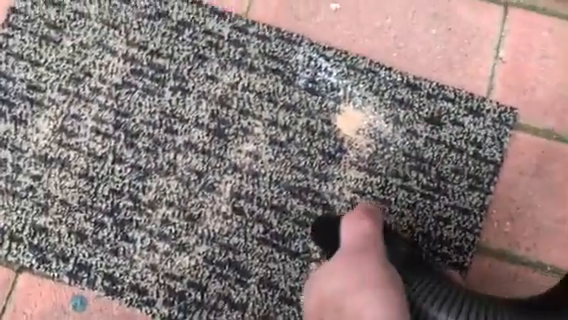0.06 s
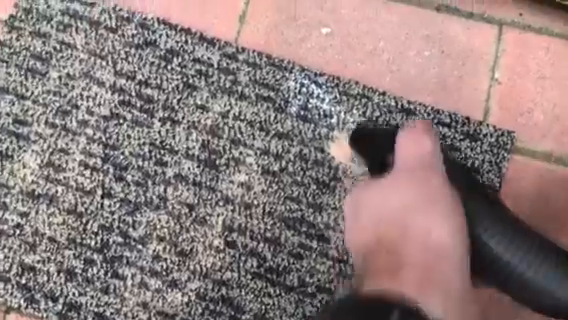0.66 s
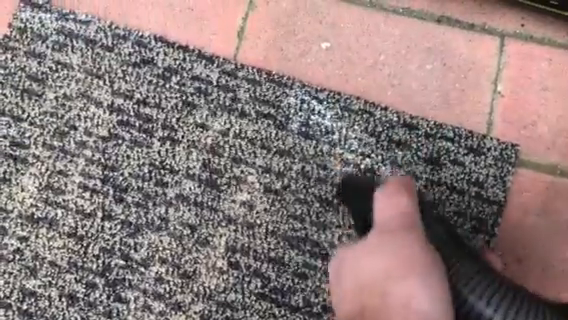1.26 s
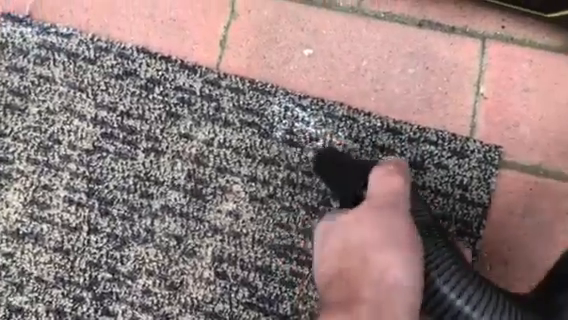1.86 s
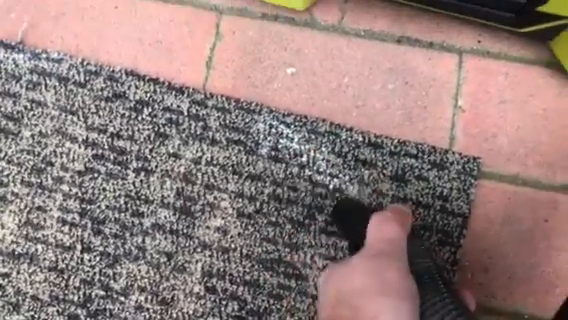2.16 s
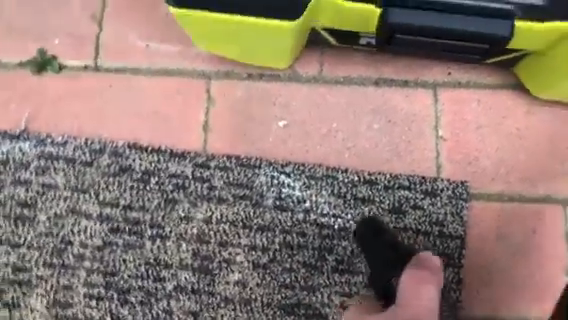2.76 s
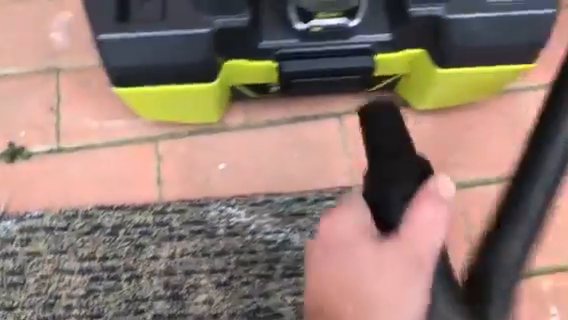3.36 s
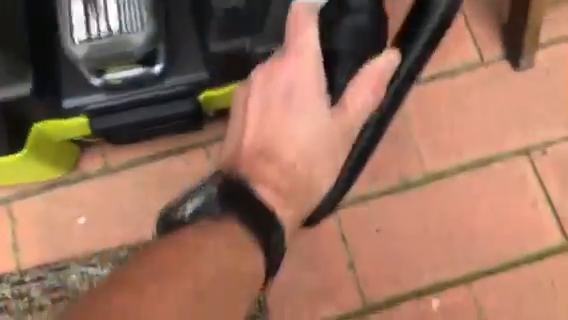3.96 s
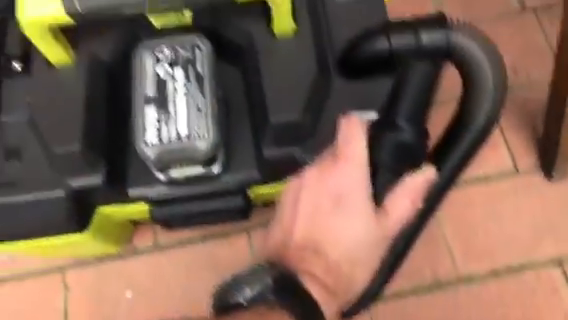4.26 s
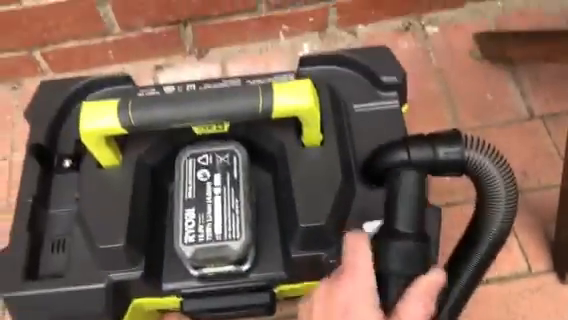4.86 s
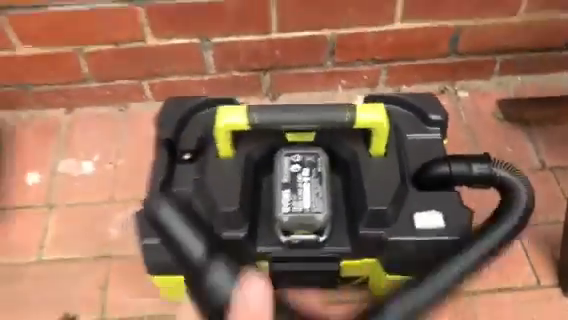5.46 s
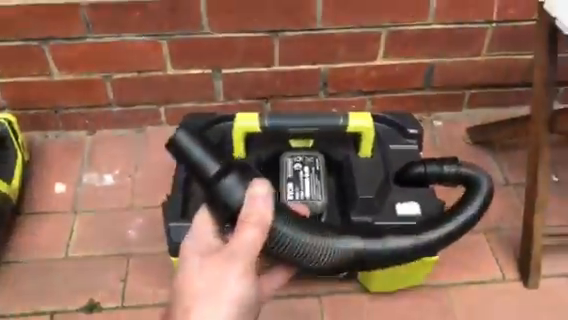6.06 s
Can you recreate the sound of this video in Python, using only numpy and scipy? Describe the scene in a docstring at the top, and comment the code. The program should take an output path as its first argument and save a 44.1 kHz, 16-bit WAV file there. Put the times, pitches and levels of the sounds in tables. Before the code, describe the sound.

A vacuum cleaner whines and rushes with air, its nozzle hissing against a mat, then it is switched off and winds down.

```python
"""Wet-dry vacuum on a doormat.

A cordless vacuum runs outdoors on brick paving: the rotor hums, the fan whines, the bearings
sing and air rushes through hose and tub. Pressed on the mat, the nozzle hisses and the unloaded
fan speeds up. The microphone moves from mat to machine; then the motor is switched off and
coasts, its tones gliding down through the resonances of housing, fan chamber and tub."""
import sys
import numpy as np
from scipy import signal
from scipy.fft import rfft, irfft
from scipy.io import wavfile
from scipy.ndimage import uniform_filter1d

SR = 44100
rng = np.random.default_rng(int(sys.argv[2]) if len(sys.argv) > 2 else 0)


def materialize(psi):
    """Save the field psi as 16-bit PCM at rate SR to the path in sys.argv[1].

    A 1-D psi becomes a single channel; in a 2-D psi each row is a channel.
    """
    bounded = np.clip(np.atleast_2d(psi).T, -1, 1)
    quanta = np.round(bounded * 32767).astype(np.int16)
    wavfile.write(sys.argv[1], SR, quanta)


N = 274302
TIME = np.arange(N) / SR
FREE_HZ, OFF_S = 356.67, 4.801  # shaft speed with the nozzle open; switch-off
BAND_LIMIT_HZ = 15700


def motor(jitter_turns=0.0015):
    """All tones lock to one slightly unsteady shaft."""
    speed = shaft_hz(TIME)
    turns = np.cumsum(speed) / SR + jitter_turns * wander(17)
    return hum(turns, speed) + whines(turns, speed) + overtones(turns, speed) + brushes(turns, speed)


def shaft_hz(t, sag_hz_per_s=0.24, sealed_rise_hz=4.55, inertia_s=0.19, drag_s=1.1916, friction_hz=102.7):
    """The battery sags; a sealed nozzle unloads the fan; after switch-off, drag and friction brake it."""
    grid_s = np.arange(-SR // 2, N, 50) / SR
    pole = np.exp(-(grid_s[1] - grid_s[0]) / inertia_s)
    unloaded = np.interp(t, grid_s, signal.lfilter([1 - pole], [1, -pole], seal(grid_s)))
    powered_hz = FREE_HZ - sag_hz_per_s * np.minimum(t, OFF_S) + sealed_rise_hz * unloaded
    return (powered_hz + friction_hz) / (1 + np.maximum(t - OFF_S, 0) / drag_s) - friction_hz


def speed_db(t):
    """Shaft speed relative to free running."""
    return 20 * np.log10(shaft_hz(t) / FREE_HZ)


# Hum at the moving microphone: time_s, level_db
HUM_LEVELS = [(0.0, -13.5), (0.07, -13), (1.94, -13), (2.66, -14), (2.86, -13), (3.26, -15.5), (3.74, -14),
              (4.06, -16.5), (4.8, -19)]
# Tub resonances and cancellations: centre_hz, width_hz, lift_db
TUB_HUM_MODES = [(151, 14, 7), (165, 4.3, -21), (191, 30, 10), (260, 17, 3), (296, 9, -10), (317, 32, 2.5)]


def hum(turns, speed, speed_power=3.44, flutter=0.077, flutter_hz=38, sway_db=0.35):
    """The unbalanced rotor hums once a turn; hose buffeting shakes its level and phase."""
    shake = flutter * amp(buffeting_db(TIME))
    level_db = curves(HUM_LEVELS)[0] + speed_power * speed_db(TIME)
    level_db += lift(TUB_HUM_MODES, speed) + sway_db * wander(4)
    shaken_turns = turns + shake * wander(flutter_hz) / (2 * np.pi)
    return tone(shaken_turns, level_db) * (1 + shake * wander(flutter_hz))


# Low, mid and top fan whine: shaft_order
FAN_ORDERS = [9, 15, 18]
# Each whine under power, at the moving microphone: time_s, level_db
LOW_WHINE_LEVELS = [(0.0, -25), (0.64, -34.5), (0.72, -50), (1.198, -41), (1.6, -43), (2.0, -33.5),
                    (2.159, -54), (2.32, -34.5), (3.12, -31), (3.68, -37), (3.919, -29.6), (4.0, -36.5),
                    (4.8, -41.5)]
MID_WHINE_LEVELS = [(0.0, -26.5), (1.36, -32), (1.52, -36), (2.32, -34), (2.4, -59), (2.72, -38),
                    (3.04, -46), (3.36, -25.5), (3.92, -34), (4.08, -30), (4.48, -34.4), (4.56, -57),
                    (4.8, -31)]
TOP_WHINE_LEVELS = [(0.0, -34.5), (0.32, -24.5), (0.48, -23), (0.8, -34.5), (1.04, -31), (2.0, -31.5),
                    (2.4, -40), (2.48, -29.5), (2.8, -33), (3.12, -25.8), (3.68, -30), (3.84, -41),
                    (4.0, -32), (4.8, -31.8)]
# Coasting, one row per whine: base_db, speed_power
WHINE_DECAYS = [(-37, 2.5), (-36, 2.9), (-39, 3.9)]
# Fan-chamber resonances: shaft_order, centre_hz, width_hz, lift_db
CHAMBER_MODES = [(9, 3050, 260, 10.5), (9, 2120, 300, 14.5), (15, 4680, 590, 9.5), (15, 3480, 130, 7),
                 (18, 5100, 380, 6)]


def whines(turns, speed, roughness=0.15, echo_depth=0.79, handover_s=0.033, waver_db=0.75):
    """Three fan whines; coasting, they fade with speed and flare in the chamber's resonances."""
    coasting = np.clip((TIME - OFF_S) / handover_s, 0, 1)
    slowing_db = speed_db(TIME)
    levels = (LOW_WHINE_LEVELS, MID_WHINE_LEVELS, TOP_WHINE_LEVELS)
    out = np.zeros(N)
    for order, level, (base_db, speed_power) in zip(FAN_ORDERS, levels, WHINE_DECAYS):
        hz = order * speed
        powered_db = curves(level)[0] + waver_db * wander(7.4)
        modes = [mode for mode_order, *mode in CHAMBER_MODES if round(mode_order) == order]
        coast_db = base_db + speed_power * slowing_db + lift(modes, hz) + echo_depth * echoes_db(hz)
        whine = tone(order * turns, powered_db + (coast_db - powered_db) * coasting)
        out += whine * (1 + roughness * wander(35))
    return out


# Weaker tones, fractional ones from the ball bearings: shaft_order
OVERTONE_ORDERS = [2, 2.452, 2.598, 3, 4, 5.196, 7, 7.794, 10, 13, 14, 15.588, 21, 22, 27, 28, 35, 36, 42,
                   49]
# Their base levels, one row per order: over_mat_db, over_machine_db, coasting_db
OVERTONE_LEVELS = [(-38, -36, -57.5), (-40, -44.5, -70), (-38, -33, -46), (-41, -48, -57),
                   (-50, -47.5, -71), (-42, -48, -54), (-38.5, -42.5, -54), (-41, -61, -65.5),
                   (-47, -45, -57.5), (-45, -49, -57), (-44, -41.5, -69), (-64, -57, -58),
                   (-57, -47, -49.5), (-57, -56, -56), (-42, -49, -71), (-55, -62, -58.5), (-60, -59, -63),
                   (-48, -71, -72), (-52, -66, -65), (-68, -60, -62)]
# Fan-casing resonance, reached as the fan speeds up: centre_hz, width_hz, lift_db
CASING_MODES = [(9740, 70, 8.5)]


def overtones(turns, speed, speed_power=0.35, handover_s=0.12, waver_db=1.72):
    """Bearing tones and weak shaft harmonics; coasting, they flare in the housing's resonances."""
    coasting = np.clip((TIME - OFF_S) / handover_s, 0, 1)
    fall_db = speed_power * speed_db(TIME)
    out = np.zeros(N)
    for order, (mat_db, machine_db, coasting_db) in zip(OVERTONE_ORDERS, OVERTONE_LEVELS):
        hz = order * speed
        powered_db = mat_db + (machine_db - mat_db) * over_machine(TIME)
        powered_db += lift(CASING_MODES, hz) + waver_db * wander(0.99)
        unpowered_db = coasting_db + fall_db + housing_db(hz)
        out += tone(order * turns, powered_db + (unpowered_db - powered_db) * coasting)
    return out


def brushes(turns, speed, base_db=-80.0, segments=7, segment_lift_db=8.5, spread_db=3):
    """Brushes tick over the commutator segments: a thin buzz from switch-off onward."""
    start = round(OFF_S * SR)
    out = np.zeros(N)
    for order in sorted(set(range(11, 113)) - set(OVERTONE_ORDERS + FAN_ORDERS)):
        hz = order * speed[start:]
        order_db = base_db + segment_lift_db * (order % segments == 0) + spread_db * rng.standard_normal()
        level_db = order_db - 22 * np.log10(order / 50) + housing_db(hz)
        out[start:] += tone(order * turns[start:], level_db) * (hz < BAND_LIMIT_HZ)
    return out


# Motor-housing resonances: centre_hz, width_hz, lift_db
HOUSING_MODES = [(240, 39, 16), (401, 47, 9.5), (564, 150, -12), (740, 144, 8), (893, 164, 16.5),
                 (1030, 55, 20), (1850, 230, 10.5), (2294, 210, 5), (3100, 220, -1), (3840, 570, 10.5),
                 (4700, 280, 6), (5440, 360, 6), (6360, 420, 5.5), (7540, 500, 5.5), (10900, 750, 7)]


def housing_db(hz):
    """The housing's resonances and steep treble fall, plus echo ripple."""
    grid_hz = np.geomspace(100, SR / 2, 1500)
    treble_db = np.interp(grid_hz, [11500, 13000], [0, -14])
    return np.interp(hz, grid_hz, lift(HOUSING_MODES, grid_hz) + treble_db) + echoes_db(hz)


# Exhaust base spectrum: freq_hz, density_db_per_hz
EXHAUST_SPECTRUM = [(20, -110), (70, -82.5), (170, -65.5), (400, -67.5), (900, -67.5), (1600, -65),
                    (2600, -64.5), (4500, -68), (6500, -64), (9000, -67), (11500, -72.5), (15500, -78.5)]
# Air resonances of tub and ducts: centre_hz, width_hz, lift_db
TUB_AIR_MODES = [(560, 84, 7), (760, 82, 7.5), (1200, 260, 9), (2300, 780, 1.5), (3000, 260, 2.5),
                 (4010, 500, 5.5), (5070, 830, 4.5)]
# Exhaust at the moving microphone: time_s, gain_db, roar_db
EXHAUST_LEVELS = [(0, -1, 6.5), (2.6, -0.5, 7.5), (3.25, 1, 1.5), (3.75, -1, 7.5), (4.8, 0.5, 9.5),
                  (5.6, 2.5, 7), (6.22, -5, 9)]


def exhaust(t, hz, sealed_roar_db=-5, ripple_db=1.5, gust_db=0.84):
    """Turbulent air coloured by the tub; it fades and dulls as the fan slows."""
    gain_db, roar_db = curves(EXHAUST_LEVELS, t)
    roar = (roar_db + sealed_roar_db * seal(t)) * lift([(610, 550, 0.78)], hz)
    overhead_colour = lift([(1205, 239, -4), (2098, 190, 2.5), (3850, 630, 2.0), (7900, 8500, -2.0)], hz)
    colour = spectrum(EXHAUST_SPECTRUM, hz) + lift(TUB_AIR_MODES, hz) + over_machine(t) * overhead_colour
    speed_power = spectrum([(100, 1.6), (1000, 2.77), (4000, 2.73), (8000, 3.54), (15000, 3.4)], hz)
    shape = (len(hz), len(t))
    # shifting reflections from the paving
    ripple = ripple_db * patches(shape, bins=5, frames=110) * np.clip(hz / 2500, 0, 1)
    gusts = gust_db * patches(shape, bins=40, frames=8)
    return colour + gain_db + roar + speed_power * speed_db(t) + ripple + gusts


# Nozzle base spectrum: freq_hz, density_db_per_hz
HISS_SPECTRUM = [(20, -110), (900, -70), (1500, -68), (1900, -64), (2200, -59.5), (2700, -65), (3600, -66),
                 (4500, -69), (8000, -112), (15500, -76)]
# Strokes on the mat: start_s, end_s, bite_s, seal_fraction, hiss_db, rasp_db
NOZZLE_STROKES = [(-0.06, 0.495, 0.0203, 1.0, -1.5, 10), (0.846, 1.287, 0.17, 0.55, 1, 2),
                  (1.44, 1.538, 0.038, 0.55, -2, 5), (1.881, 2.665, 0.22, 0.56, 0, -8)]


def nozzle(t, hz, rasp_build_s=0.13, open_near_db=-9, open_far_db=-10, grain_db=1.5):
    """Air hisses through the mat's fibres and rasps as suction builds; the open nozzle hisses faintly."""
    start_s, *_, hiss_db, rasp_db = np.transpose(NOZZLE_STROKES)
    suction = 1 - np.exp(-np.maximum(t - start_s[:, None], 0) / rasp_build_s)
    pressed = contact(t)
    open_hiss = amp(open_near_db + (open_far_db - open_near_db) * over_machine(t))
    gain_db = 20 * np.log10(open_hiss + amp(hiss_db) @ pressed)
    rasp = (rasp_db @ (pressed * suction)) * lift([(3840, 950, 0.87)], hz)
    grain = grain_db * patches((len(hz), len(t)), bins=24, frames=5)
    return spectrum(HISS_SPECTRUM, hz) + gain_db + rasp + 3 * speed_db(t) + grain


def contact(t, release_s=0.0179):
    """One row per stroke, 0 to 1: the nozzle bites into the mat, then lets go quickly."""
    rows = []
    for start_s, end_s, bite_s, *_ in NOZZLE_STROKES:
        bite = 1 - np.exp(-np.maximum(t - start_s, 0) / bite_s)
        rows.append(bite * np.exp(-np.maximum(t - end_s, 0) / release_s))
    return np.array(rows)


def seal(t):
    """How far the mat closes the nozzle, 0 to 1."""
    return np.array(NOZZLE_STROKES)[:, 3] @ contact(t)


# Hose base spectrum: freq_hz, density_db_per_hz
HOSE_SPECTRUM = [(20, -100), (60, -87), (100, -106), (140, -62), (200, -58.5), (260, -62), (380, -58.5),
                 (480, -67), (900, -82.5), (3000, -100), (15500, -120)]


def hose(t, hz):
    """Low buffeting of air in the ribbed hose."""
    return spectrum(HOSE_SPECTRUM, hz) + buffeting_db(t) + speed_db(t)


def buffeting_db(t, open_db=1, sealed_change_db=-6, far_change_db=-13):
    """Buffeting is strongest with free airflow and the microphone near the hose."""
    return open_db + sealed_change_db * seal(t) + far_change_db * over_machine(t)


# Bearing base spectrum: freq_hz, density_db_per_hz
ROLLING_SPECTRUM = [(20, -120), (300, -103), (1000, -84), (2500, -86.5), (4500, -89), (7000, -100),
                    (11000, -108), (15500, -120)]


def bearings(t, hz, ring=0.58):
    """Rolling balls keep the housing ringing softly and steadily."""
    return spectrum(ROLLING_SPECTRUM, hz) + ring * lift(HOUSING_MODES, hz)


def echoes_db(hz, reflection=0.37):
    """Three echoes off paving and wall ripple the spectrum; a gliding treble tone flutters through it."""
    grid_hz = np.geomspace(100, SR / 2, 2000)
    delays_s = rng.uniform(.002, .007, (3, 1))
    bounced = reflection * np.exp(-2j * np.pi * grid_hz * delays_s).sum(0)
    bounced *= np.clip(grid_hz / 4000, 0, 1)
    return np.interp(hz, grid_hz, 10 * np.log10(abs(1 + bounced) ** 2 + 0.039))


# Outdoor background: freq_hz, density_db_per_hz
YARD_SPECTRUM = [(20, -116), (45, -75), (70, -79), (150, -82), (400, -80), (600, -88), (1200, -105),
                 (4000, -102), (8000, -107), (15500, -120)]


def yard(t, hz):
    """Steady low outdoor rumble."""
    return spectrum(YARD_SPECTRUM, hz)


def over_machine(t):
    """Microphone position: 0 over the mat, 1 over the machine."""
    return np.interp(t, [2.8, 4.0], [0, 1])


def amp(db):
    """Decibels to gain."""
    return 10 ** (np.asarray(db) / 20)


def curves(rows, t=TIME):
    """Table columns interpolated over time."""
    time_s, *columns = np.transpose(rows)
    return [np.interp(t, time_s, column) for column in columns]


def spectrum(points, hz):
    """Points interpolated over log frequency."""
    freq_hz, values = np.transpose(points)
    return np.interp(np.log(hz + 1), np.log(freq_hz + 1), values)


def lift(modes, hz):
    """Sum of bell curves, each given as centre_hz, width_hz, height."""
    return sum(height * .5 ** ((2 * (hz - centre) / width) ** 2) for centre, width, height in modes)


def wander(rate_hz):
    """Slow random motion, rms 1."""
    hz = np.fft.rfftfreq(N, 1 / SR)
    motion = irfft(rfft(rng.standard_normal(N)) / (1 + (hz / rate_hz) ** 2), N)
    return motion / motion.std()


def patches(shape, bins, frames):
    """Random time-frequency blotches, rms 1."""
    blotches = uniform_filter1d(rng.standard_normal(shape), bins, axis=0)
    blotches = uniform_filter1d(blotches, frames, axis=1)
    return blotches / blotches.std()


def tone(turns, rms_db):
    """A sine with a random starting phase."""
    return np.sqrt(2) * amp(rms_db) * np.sin(2 * np.pi * (turns + rng.random()))


def noise(density):
    """Noise shaped by density(t, hz), in dB per Hz."""
    white = rng.standard_normal(N) * np.sqrt(SR / 2)
    hz, t, frames = signal.stft(white, SR, nperseg=1024, noverlap=768)
    shaped = frames * amp(density(t, hz[:, None]))
    return signal.istft(shaped, SR, nperseg=1024, noverlap=768)[1][:N]


def scene():
    """Motor, air and yard, the same in both channels."""
    air = noise(exhaust) + noise(nozzle) + noise(hose)
    mono = motor() + noise(bearings) + air + noise(yard)
    return np.array([mono, mono])


def record(dry, low_cut_hz=45):
    """Microphone bass roll-off, then the band limit."""
    highpass = signal.butter(2, low_cut_hz, "highpass", fs=SR, output="sos")
    lowpass = signal.firwin(1023, BAND_LIMIT_HZ, window=("kaiser", 9), fs=SR)
    return signal.oaconvolve(signal.sosfilt(highpass, dry), lowpass[None], "same", axes=1)


dry = scene()
out = record(dry)
materialize(out)
```